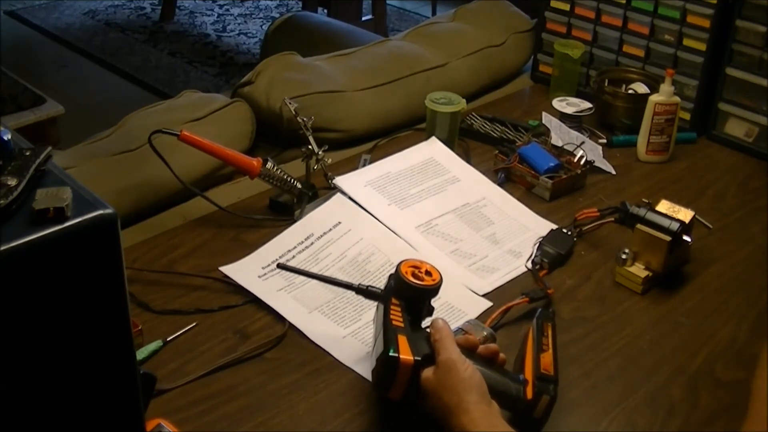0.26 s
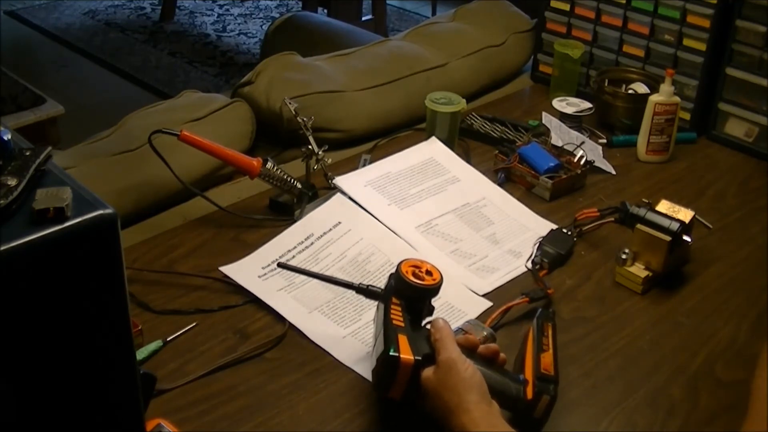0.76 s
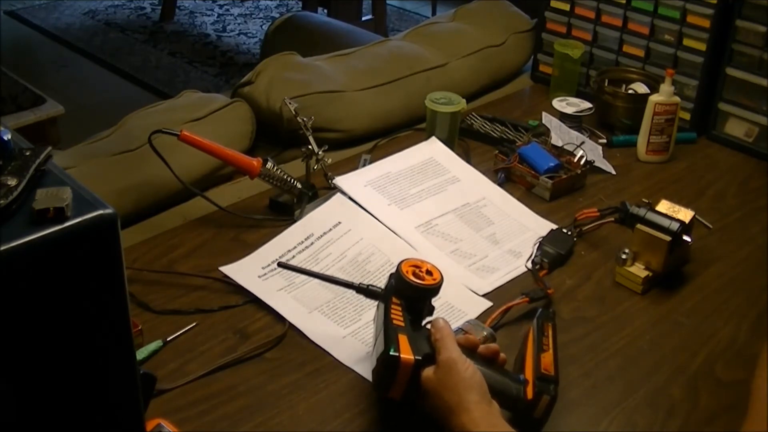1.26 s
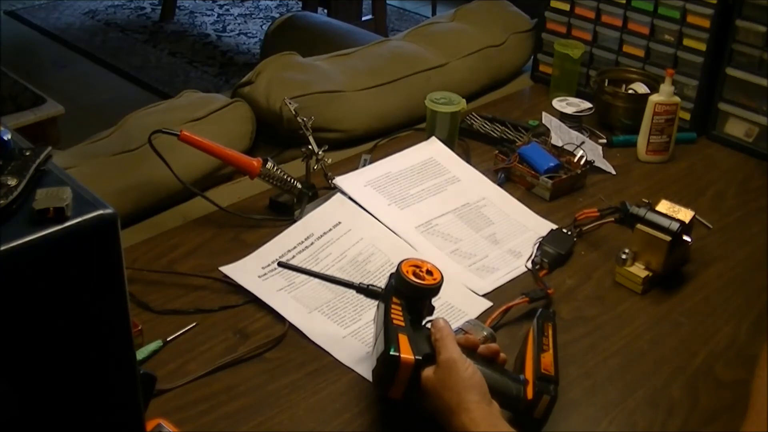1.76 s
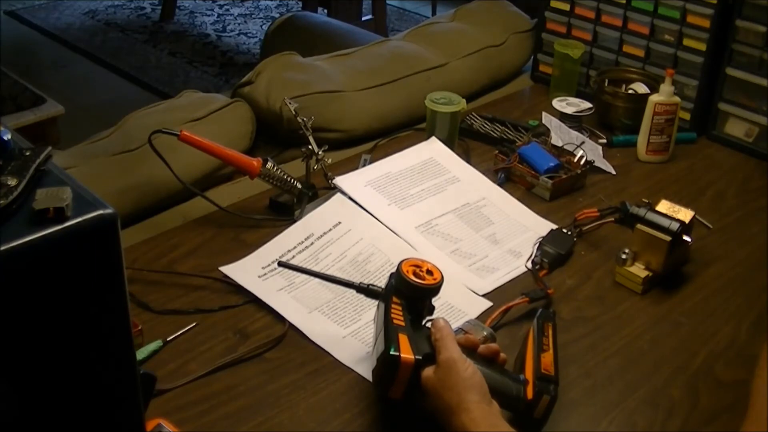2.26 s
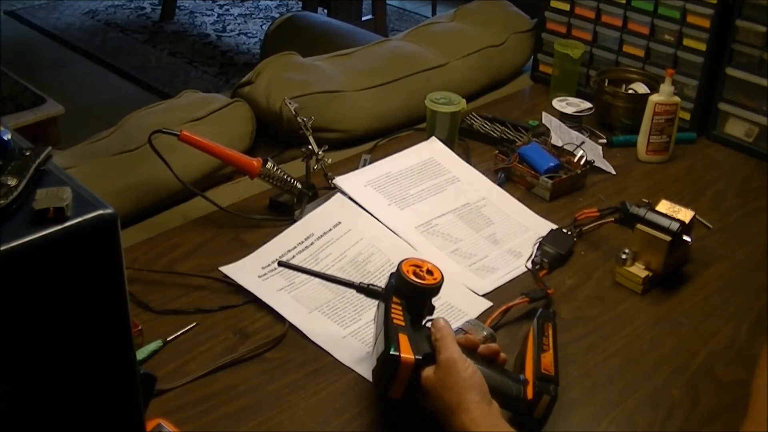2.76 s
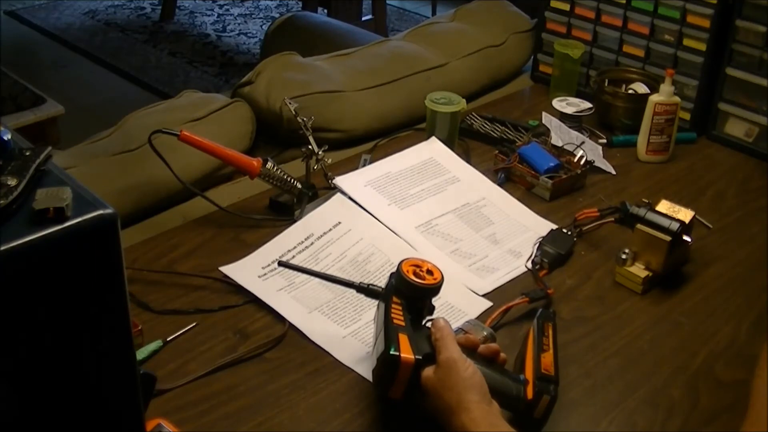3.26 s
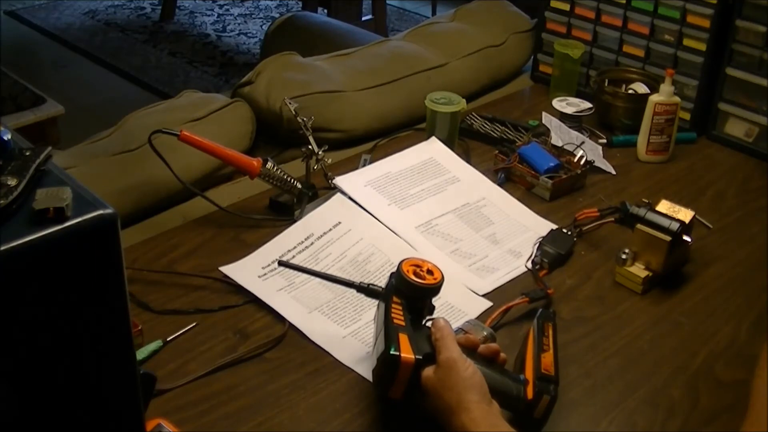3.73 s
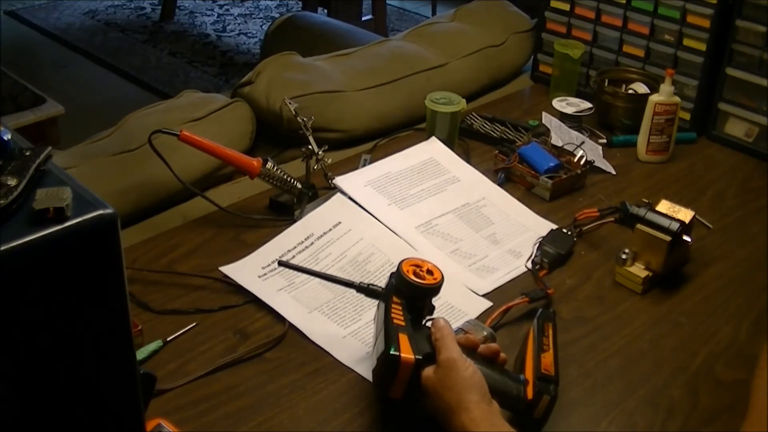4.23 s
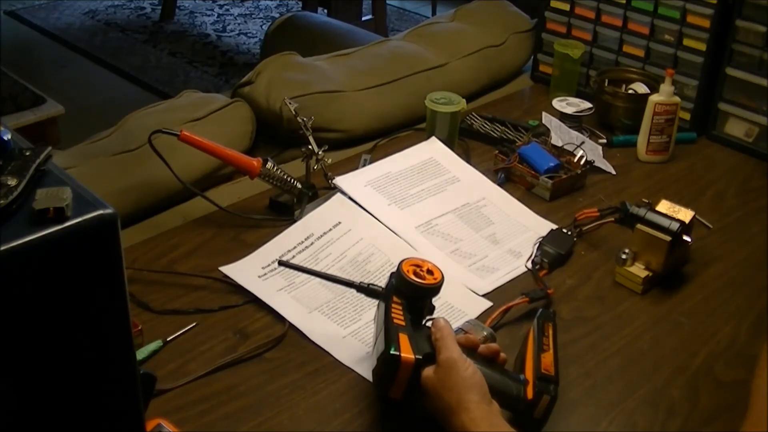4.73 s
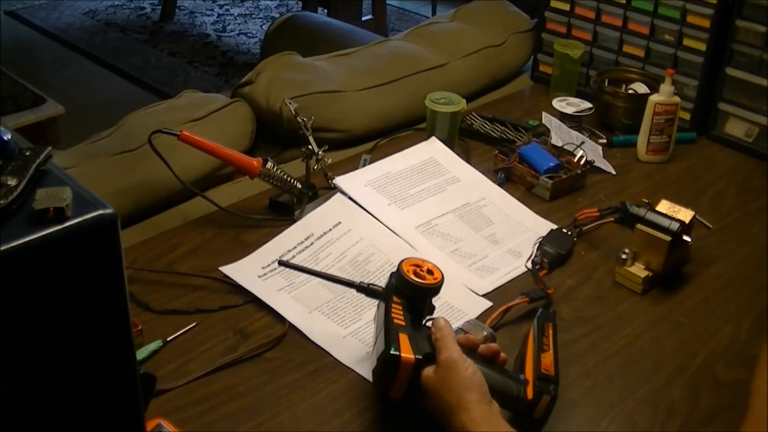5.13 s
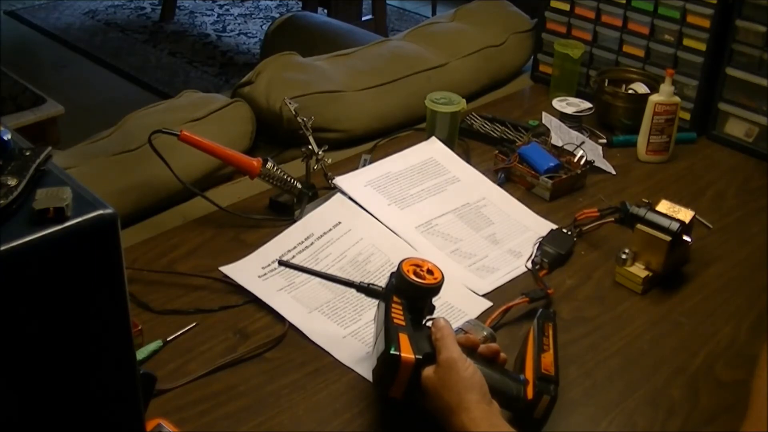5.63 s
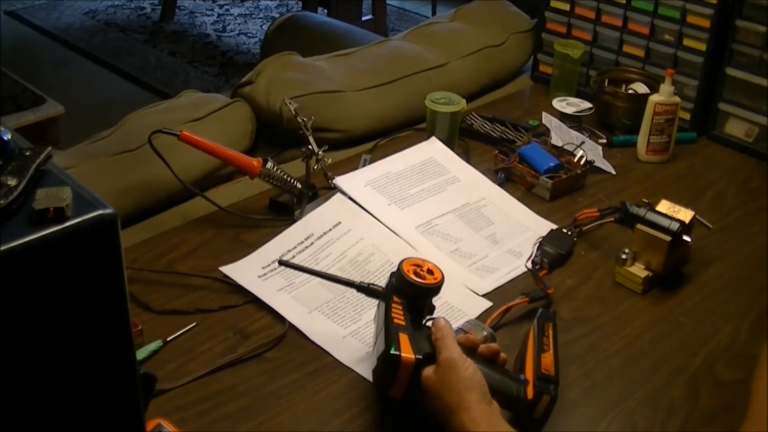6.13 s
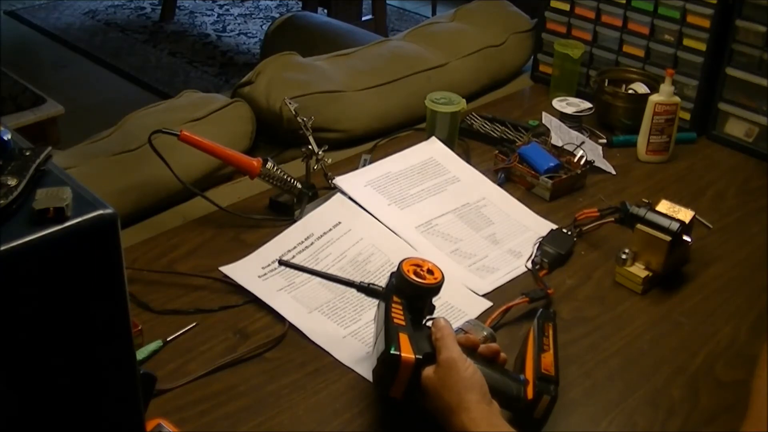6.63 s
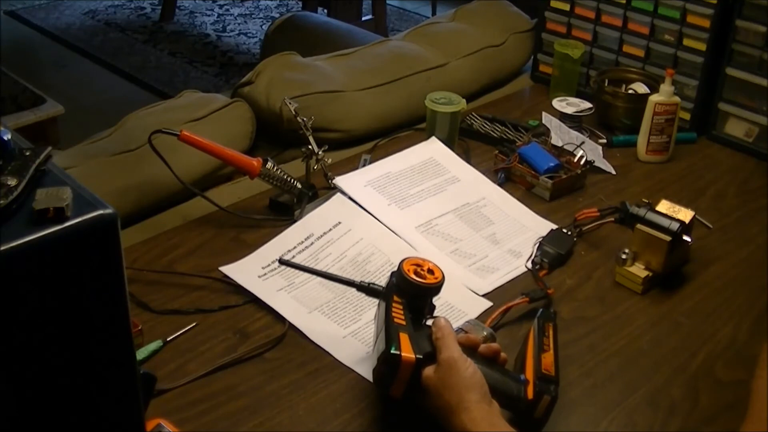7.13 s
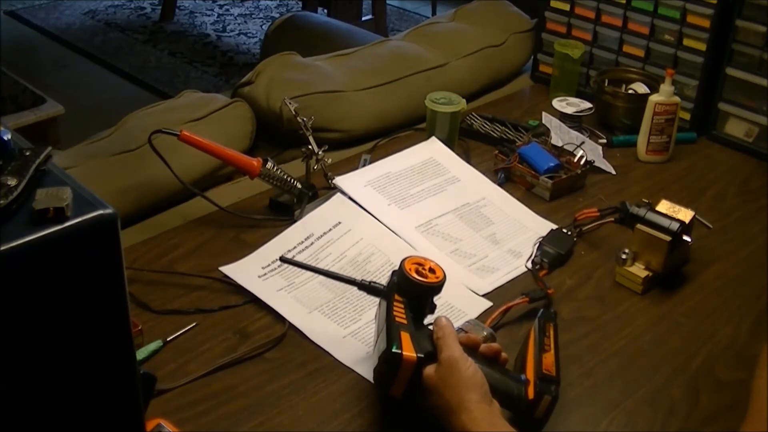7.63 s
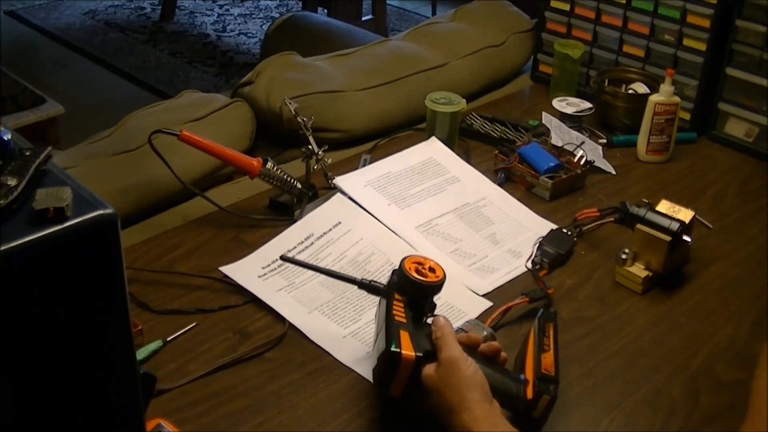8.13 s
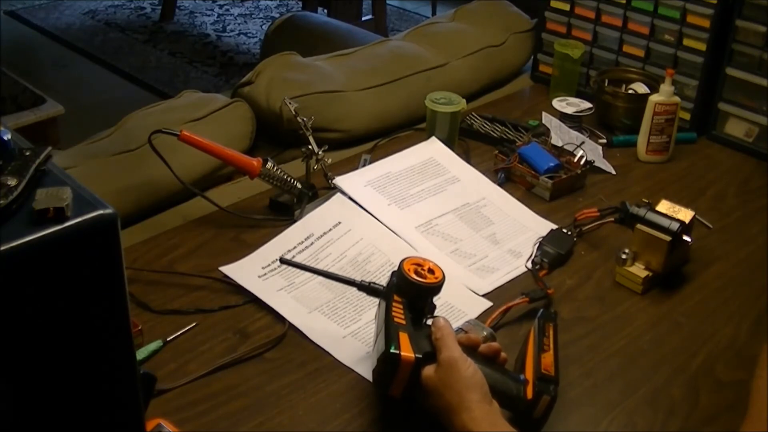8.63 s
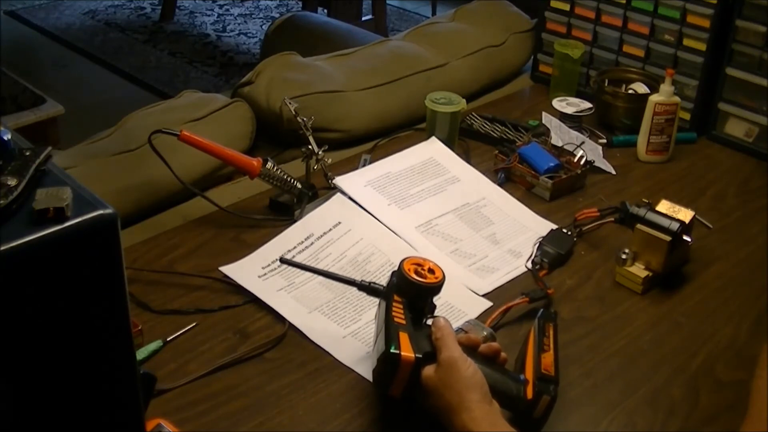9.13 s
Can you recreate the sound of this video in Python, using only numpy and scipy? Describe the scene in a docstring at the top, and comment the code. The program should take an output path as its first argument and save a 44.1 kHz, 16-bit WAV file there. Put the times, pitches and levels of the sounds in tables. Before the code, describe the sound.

A small electric motor is already running fast, close to the microphone on a wooden workbench, with a high whine and the rattle, ring and hiss of dry bearings. Its pitch eases down from about 0.5 seconds, drops further just after 2 seconds, and sinks again from 3.5 seconds. From around 4.5 to 6.8 seconds it crawls along more quietly, with a lower wavering whine, scattered light ticks and a faint high whistle. At 6.8 seconds a bright tick starts a quick rev back to full speed, where the pitch wobbles slightly. One sharp, loud knock lands at 7.8 seconds. From 8 seconds the motor coasts down, falling in pitch, and stops with a faint rub at about 9 seconds. Short echoes and the soft hush of a small room lie behind it.

```python
"""A small brushless motor on a wooden workbench, close to a stereo microphone in a quiet, cluttered room.
It runs at speed, steps down to a crawl, is revved again and coasts to a stop with a faint rub.
Magnetic pull and imbalance whine on multiples of its rotation; its dry bearings rattle, ring, hiss and
tick; at low throttle the controller's switching whistles. A bright tick starts the run-up and something
knocks sharply at its top. Short echoes and room tone lie behind."""
import sys
import numpy as np
from scipy import signal
from scipy.fft import rfft, irfft
from scipy.io import wavfile

SR = 44100
rng = np.random.default_rng(int(sys.argv[2]) if len(sys.argv) > 2 else 0)


def materialize(psi):
    """Save the field psi as 16-bit PCM at rate SR to the path in sys.argv[1].

    A 1-D psi becomes a single channel; in a 2-D psi each row is a channel.
    """
    bounded = np.clip(np.atleast_2d(psi).T, -1, 1)
    quanta = np.round(bounded * 32767).astype(np.int16)
    wavfile.write(sys.argv[1], SR, quanta)


N = 413767

FULL_SPEED, FULL_TORQUE = 320.4, 1400   # starting speed in rps (turns per s); full torque in rps per s
COAST_S, FRICTION, DRAG = 7.974, 160, 0.838   # throttle closes; steady loss in rps per s; drag per s
FIZZ_DB, FIZZ_DB_PER_DECADE = -51, 45.5   # at full speed; growth with speed
SWITCHING_HZ, CUTOFF_HZ = 7989, 15750
# the whistle: level at low throttle; loss at full speed; gain under full torque
WHISTLE_DB, WHISTLE_FADE_DB, WHISTLE_SURGE_DB = -78, 27, 22.5

# moves of the throttle: start_s, length_s, goal_rps, rotor_lag_s
THROTTLE_MOVES = [(0.45, .31, 293.3, .074), (1.347, .329, 266.5, .04), (2.144, .128, 207.6, .122),
                  (2.371, .305, 161, .118), (3.491, .445, 48.1, .334), (4.668, .017, 59.7, .3),
                  (5.78, .334, 41.9, .054), (6.171, .04, 50.7, .14), (6.8, .13, 315.3, .052),
                  (7.167, .138, 282.5, .036), (7.351, .099, 305.3, .026), (7.483, .073, 287.6, .023),
                  (7.591, .108, 316.9, .071), (7.849, .105, 300.1, .039)]
# resonances of mount and bell that the tooth whine sweeps through: centre_hz, width_hz, level_db
WHINE_RESONANCES = [(711, 130, -62), (884, 120, -43.5), (1030, 86, -41), (1330, 170, -43), (1830, 850, -54),
                    (2730, 230, -54), (3276, 143, -40.5), (3548, 200, -43.5), (3780, 110, -53.5)]
# brief dips and swells of the tooth whine: centre_s, half_length_s, gain_db
TOOTH_SWELLS = [(1.66, 0.042, 2.5), (4.44, 0.027, -17), (4.86, 0.054, -8), (5.01, 0.097, 1.5),
                (5.55, 0.21, -2), (6.0, 0.18, -3.5)]
# weaker multiples of the rotation swell on the mount's resonances; for each multiple: speed_rps, level_db
HARMONIC_LEVELS = { 1: [(125, -102), (158, -90), (180, -77), (220, -82.5), (240, -71.5), (268, -93.5),
                   (293, -66.5), (315, -67), (320, -61)], 2: [(150, -89.5), (265, -83), (293, -69.5),
                   (320, -81)], 3: [(150, -113), (198, -70), (220, -83), (267, -58.5), (280, -70),
                   (294, -58.5), (314, -64), (320, -59.5)], 11: [(60, -88), (115, -56.5), (165, -56),
                   (205, -52), (268, -58.5), (293, -47.5), (306, -59), (320, -88)], 13: [(60, -96),
                   (110, -62), (170, -62), (267, -63), (300, -81)], 14: [(80, -72), (160, -57), (230, -83),
                   (270, -109)], 22: [(170, -90), (235, -59), (267, -55), (280, -55), (294, -58),
                   (308, -54.5), (320, -52)], 23: [(48, -88), (59, -67), (68, -94)], 24: [(15, -89),
                   (37, -47), (44, -56), (50, -62), (56, -54), (60, -67), (75, -59), (110, -75)],
                   26: [(110, -76), (150, -63), (162, -62), (180, -74), (266, -73), (320, -84)],
                   60: [(45, -94), (59, -76.5), (75, -95)]}
# the dry bearings grow louder with speed, the rattle most near half speed: speed_rps, rattle_db, ring_db
BEARING_LEVELS = [(0, -97, -98), (15, -61, -83), (45, -56.5, -68), (60.2, -54, -66.5), (87.7, -52, -58.5),
                  (140, -50, -49.5), (157, -52.5, -49), (220, -53, -48), (288, -55, -48), (295, -53, -46),
                  (320, -53, -46.5)]
# the balls chatter harder: centre_s, half_length_s, rattle_gain_db, ring_gain_db, fizz_gain_db
BEARING_FLARES = [(0.1, 0.25, 1, 2.5, 1.5), (0.53, 0.074, -1, 3, 1.3), (1.25, 0.16, 0.5, 1.5, 1.5),
                  (2.164, 0.085, 3, 3, 0.5), (3.45, 0.52, 0.5, 1.5, 3), (3.98, 0.037, 1.5, 3, 3),
                  (4.31, 0.16, 1, 5.5, 3), (4.54, 0.12, 3.5, 7, 8), (6.76, 0.23, 2, 3, 2),
                  (7.45, 0.34, -0.3, 1.3, 0.2), (7.78, 0.058, 0, 3, 0.5), (7.935, .035, 2.5, 6.5, 1)]
# spectra of what the bearings shake (mount, motor bell, small parts): frequency_hz, relative_db
MOUNT_RATTLE = [(100, -58.5), (280, -28), (480, -29), (750, -11.5), (950, -5), (1130, -7.5), (1330, -0.5),
                (1600, -1.5), (1950, 3.5), (2250, -2), (2550, -14), (3100, -19.5), (6000, -42.5)]
BELL_RING = [(700, -33), (1900, -25), (2450, -8), (2850, -6.5), (3020, -14.5), (3400, -9), (4000, -10.5),
             (4600, -4.5), (4900, 0), (5120, -8), (5330, -6.5), (5550, -18.5), (7500, -22), (12000, -48.5)]
PARTS_FIZZ = [(1000, -48), (3000, -28), (5500, 9), (5850, 2), (6150, -14), (6550, 9), (6850, -8.5),
              (7700, 5), (8200, 4), (9100, 12.5), (9800, 4), (11400, -6), (13200, -17.5), (15000, -10.5),
              (16000, -39)]
# narrow modes of the motor bell: pitch_hz, t60_s, relative_db
BELL_MODES = [(2735, .06, -10), (4880, .035, -12.5), (5040, .03, -16)]
# tones of the slipping balls: rotation_multiple, loudest_rps, level_db, loss_db_per_100_rps
SKID_TONES = [(5.42, 320, -70, 34), (8.5, 320, -55.5, 51), (9.16, 287, -55.5, 35), (12.61, 320, -53, 54),
              (15.3, 320, -48.5, 29), (15.7, 320, -48.5, 38), (26, 165, -55, 45)]
# ticks of loose play in the bearings: start_s, strike_db
PLAY_TICKS = [(3.9255, -34), (4.137, -40), (4.5625, -39), (4.828, -38), (5.080, -42), (5.282, -42),
              (5.654, -41), (5.898, -42), (5.935, -40), (6.1302, -33), (6.2545, -41), (6.262, -41),
              (6.503, -43), (6.540, -41), (7.185, -35), (7.555, -33)]
# the jolt that starts the run-up: start_s, strike_db
RUN_UP_JOLT = (6.8168, -38)
# modes that the jolt rings: pitch_hz, t60_s, relative_db
RUN_UP_MODES = [(2090, 0.011, -10), (3330, 0.0088, 6), (4170, 0.0036, 5), (7140, .003, -4)]
# the knock and its chatter: start_s, strike_db
KNOCK_BLOWS = [(7.8051, -14), (7.8108, -16), (7.8158, -21.5), (7.8192, -18), (7.8254, -34)]
# modes that the knock rings: pitch_hz, t60_s, relative_db
KNOCK_RESONANCES = [(424, 0.047, -58), (690, 0.074, -43), (892, 0.066, -21), (1400, 0.02, -16.5),
                    (1975, 0.061, -22), (2345, 0.023, -7.5), (2730, 0.067, -14), (3640, 0.013, -8.5),
                    (5180, 0.0093, -8), (5720, 0.024, -13.5), (7500, 0.011, -16)]
# spectrum of the knock's wash in the bench: frequency_hz, relative_db
BENCH_WASH = [(150, -33), (350, -9.5), (800, -4), (2500, 2), (5200, -10.5), (8000, -26), (12000, -43)]
# rise and fall of the rotor's rub as it stalls: time_s, level_db
RUB_LEVELS = [(8.85, -100), (8.95, -69), (9.01, -56), (9.035, -74), (9.07, -100)]
# spectrum of that rub: frequency_hz, relative_db
RUB_SPECTRUM = [(100, -44), (190, 0), (600, 11), (2500, -4), (4260, 7.5), (5300, -3), (6400, -3),
                (7200, -7), (7850, 5), (8400, -1), (9200, -40)]
# stereo width of the echoes: frequency_hz, relative_db
ECHO_WIDTH = [(250, -1), (600, 6), (1400, -1), (2800, 7.5), (4800, -15), (7000, 4.5), (9000, 6.5),
              (13000, -9)]
# room tone at the microphone, mid and side: frequency_hz, relative_db
AIR_MID = [(25, -23), (110, -21.5), (170, -16.5), (300, -9), (500, 1), (900, 7.5), (2000, 0), (3000, -1),
           (5000, -7), (8000, -15), (12000, -23.5), (16000, -40)]
AIR_SIDE = [(25, -5), (110, -10), (300, 4), (900, 6.5), (2000, -6), (5000, -2.5), (8000, -19), (12000, -42),
            (16000, -47)]


def whine(speed, turns, teeth=12, flutter_db=1.8, shimmer_db=0.5, jitter_turns=0.0028,
          wobble=0.25, wobble_rps=105, coast_db=-12):
    """Magnetic pull and imbalance give tones on exact multiples of the rotation."""
    angle = 2 * np.pi * (turns + jitter_turns * drift(35))
    swell = from_db(swells(TOOTH_SWELLS)[0] + shimmer_db * drift(70))
    out = tooth_gain(teeth * speed) * swell * np.sin(teeth * angle)
    # around one speed the rotor wobbles in its play and the tooth whine rasps
    out *= 1 + wobble * np.exp(-((speed - wobble_rps) / 35) ** 2) * (np.sin(angle) + drift(160))
    for multiple, rows in HARMONIC_LEVELS.items():
        rps, db = np.transpose(rows)
        flutter = flutter_db * min(multiple / 10, 1) * drift(25)   # the lowest tones are steadiest
        level = np.interp(speed, rps, db) + flutter
        if multiple == 24:   # torque ripple fades without current
            level += coast_db * coasting()
        audible = (multiple * speed < CUTOFF_HZ) * np.minimum(speed / rps[0], 1) ** 5
        out += audible * from_db(level) * np.sin(multiple * angle + rng.uniform(0, 2 * np.pi))
    return np.sqrt(2) * out


def tooth_gain(hz, lowest_hz=700):
    """The whine swells on each resonance and radiates little below the lowest."""
    peaks = sum(from_db(db) / (1 + (2 * (hz - centre) / width) ** 2)
                for centre, width, db in WHINE_RESONANCES)
    return peaks * np.minimum(hz / lowest_hz, 1) ** 3


def rotor_speed():
    """The rotor lags behind each move of the throttle, then friction and drag bring it to rest."""
    t = np.arange(N) / SR
    speed, before = np.full(N, FULL_SPEED), FULL_SPEED
    for start, length, goal, lag in THROTTLE_MOVES:
        ramp = np.clip((t - start) / length, 0, 1)
        pole = np.exp(-1 / (lag * SR))
        speed += (goal - before) * signal.lfilter([1 - pole], [1, -pole], ramp)
        before = goal
    release_speed = np.interp(COAST_S, t, speed)
    free = (release_speed + FRICTION / DRAG) * np.exp(-DRAG * (t - COAST_S)) - FRICTION / DRAG
    return np.where(t < COAST_S, speed, np.maximum(free, 0))


def torque(speed):
    """Share of the full torque that goes into speeding up."""
    return np.clip(np.gradient(speed) * SR / FULL_TORQUE, 0, 1)


def coasting(fade_s=0.4):
    """0 under power, 1 once the current has died away."""
    return np.clip((np.arange(N) / SR - COAST_S) / fade_s, 0, 1)


def bearings(speed, turns, rattle_db=-1.0, ring_db=-0.5, modes_db=0.5, unsteady_db=1.15):
    """The rolling force rattles the mount, rings the bell and fizzes in the small parts."""
    rattle, bell, fizz = bearing_gains(speed)
    front, rear = rolling(speed, turns, track_db=3), rolling(speed, turns, track_db=1)
    modes = sum(from_db(db + modes_db) * rms_one(ring(front, hz, t60)) for hz, t60, db in BELL_MODES)
    out = from_db(rattle_db) * rattle * colour(front, MOUNT_RATTLE)
    out += bell * (from_db(ring_db) * colour(rear, BELL_RING) + (speed / FULL_SPEED) ** 0.3 * modes)
    out += fizz * colour(rolling(speed, turns, track_db=-0.5), PARTS_FIZZ)
    return high_pass(out * from_db(unsteady_db * drift(60)), hz=320, order=3)


def rolling(speed, turns, track_db, cage_ratio=.385, hiss_db=-4, hits_per_turn=11, spread_db=3.0,
            throb=0.15, slip_turns=0.0032):
    """Force in a bearing: random ball impacts, fine friction and a rough track repeating with the cage."""
    sizes = from_db(spread_db * np.minimum(rng.exponential(1, N), 4)) * rng.choice([-1, 1], N)
    chance = hits_per_turn * (speed + 10) / SR
    impacts = rms_one(sizes * (rng.random(N) < chance) / np.sqrt(chance))
    harmonics = from_db(rng.normal(0, 3, 140)) * np.exp(2j * np.pi * rng.random(140))
    roughness = rms_one(irfft(np.r_[0, harmonics], 4096))   # one lap of the track
    cage_position = (cage_ratio * turns + slip_turns * drift(20)) % 1
    track = np.interp(cage_position, np.linspace(0, 1, len(roughness)), roughness)
    buzz = from_db(track_db) * (speed / speed.max()) ** 1.02   # the faster, the more the track takes over
    hiss = from_db(hiss_db) * rng.standard_normal(N)
    force = (impacts + hiss + buzz * track) / np.sqrt(1 + buzz ** 2 / 2)
    return force * (1 + throb * np.sin(2 * np.pi * turns))   # the load swings once a turn


def bearing_gains(speed, rattle_load_db=1.0, fizz_load_db=0.5,
                  rattle_coast_db=-0.7, ring_coast_db=-0.4, fizz_coast_db=-3.0):
    """Rattle, ring and fizz follow speed and flare now and then; torque lifts rattle and fizz."""
    load, free = torque(speed), coasting()
    rps, rattle_db, ring_db = np.transpose(BEARING_LEVELS)
    rattle = np.interp(speed, rps, rattle_db) + rattle_load_db * load + rattle_coast_db * free
    bell = np.interp(speed, rps, ring_db) + ring_coast_db * free
    fizz = FIZZ_DB + FIZZ_DB_PER_DECADE * np.log10((speed + 1) / FULL_SPEED)
    fizz += fizz_load_db * load + fizz_coast_db * free
    return from_db(np.array([rattle, bell, fizz]) + swells(BEARING_FLARES))


def skidding_balls(speed, turns, slip_turns=0.0394, flutter_db=4.5):
    """The balls skid, so their tones waver and mostly lie between the multiples of the rotation."""
    out = np.zeros(N)
    for multiple, loudest_rps, db, loss_db in SKID_TONES:
        gain = from_db(db - loss_db * abs(speed - loudest_rps) / 100 + flutter_db * drift(60))
        out += gain * np.sin(2 * np.pi * multiple * (turns + slip_turns * drift(14)))
    return out


def controller(speed, turns, sideband_db=-12):
    """The switching whistle grows with current and fades towards full throttle."""
    phase = 2 * np.pi * SWITCHING_HZ * np.arange(N) / SR
    sideband = from_db(sideband_db) * np.sin(phase - 8 * np.pi * turns)   # four rotation rates below
    level = WHISTLE_DB - WHISTLE_FADE_DB * (speed / FULL_SPEED) ** 2 + WHISTLE_SURGE_DB * torque(speed)
    return np.sqrt(2) * from_db(level) * (1 - coasting()) * (np.sin(phase) + sideband)


def shaft_ticks(low_hz=1800, high_hz=4800, treble_db=-18, t60_s=.005):
    """Short dead ticks of the shaft in its play, and a brighter one as the torque returns."""
    taps, jolt = clicks(*np.transpose(PLAY_TICKS)), clicks(*np.array(RUN_UP_JOLT))
    out = ring(taps, low_hz, t60_s) + from_db(treble_db) * ring(taps, high_hz, t60_s)
    out += sum(ring(jolt, hz, t60) * from_db(db) for hz, t60, db in RUN_UP_MODES)
    return signal.sosfilt(signal.butter(3, [900, 9000], "band", fs=SR, output="sos"), out)


def knock(wash_db=-29, wash_t60_s=0.22, attack_s=0.00058):
    """A hard blow chatters a few times and leaves a short wash in the bench."""
    starts, strike_db = np.transpose(KNOCK_BLOWS)
    out = np.zeros(N)
    for k, (hz, t60, mode_db) in enumerate(KNOCK_RESONANCES):
        blows = clicks(starts, strike_db + mode_db + rng.normal(0, 1, len(starts)))
        out += ring(blows, hz, t60) * (-1) ** k
    age = np.maximum(np.arange(N) / SR - starts[0], 0)
    wash = from_db(wash_db - 60 * age / wash_t60_s) * (1 - np.exp(-age / attack_s))
    return high_pass(out + wash * colour(rng.standard_normal(N), BENCH_WASH), hz=380, order=4)


def stall_rub():
    """The rotor rubs faintly as it stalls."""
    level = np.interp(np.arange(N) / SR, *np.transpose(RUB_LEVELS))
    return from_db(level) * colour(rng.standard_normal(N), RUB_SPECTRUM)


def reflections(x, t60_s=0.45, delay_s=.003):
    """Diffuse echoes of the small room reach the microphone after the direct sound; unit power gain."""
    age = np.arange(SR // 3) / SR
    echo = rng.standard_normal(len(age)) * from_db(-60 * age / t60_s) * (age > delay_s)
    return signal.fftconvolve(x, echo / np.linalg.norm(echo))[:N]


def room_tone(spectrum, level_db=-67):
    """The steady hush of the room around the microphone."""
    return from_db(level_db) * colour(rng.standard_normal(N), spectrum)


def from_db(db):
    """Decibels to gain."""
    return np.exp(np.asarray(db) * (np.log(10) / 20))


def rms_one(x):
    """Scale to unit rms."""
    return x / np.sqrt(np.mean(x ** 2) + 1e-20)


def drift(rate_hz):
    """A random wander of unit rms that turns about rate_hz times a second."""
    knots = rng.standard_normal(N // 10)
    return rms_one(np.interp(np.arange(N) / SR * rate_hz, np.arange(len(knots)), knots))


def swells(rows):
    """Bell-shaped rises and falls in dB, one track for each level column."""
    t = np.arange(N) / SR
    return sum(np.outer(db, np.exp(-np.minimum(((t - centre) / half_length) ** 2, 20)))
               for centre, half_length, *db in rows)


def colour(x, spectrum, size=16384):
    """Causal filter with the given spectrum; the result has unit rms."""
    hz, db = np.transpose(spectrum)
    bins_hz = np.fft.rfftfreq(size, 1 / SR)
    log_gain = np.log(from_db(np.interp(np.log1p(bins_hz), np.log(hz), db)))
    cepstrum = irfft(log_gain)[:size // 2]
    response = irfft(np.exp(2 * rfft(cepstrum, size) - cepstrum[0]))   # minimum phase
    return rms_one(signal.oaconvolve(x, response)[:N])


def ring(x, hz, t60):
    """One mode: a unit click sets a sine of height 1 ringing."""
    r, w = from_db(-60 / (t60 * SR)), 2 * np.pi * hz / SR
    return signal.lfilter([0, np.sin(w)], [1, -2 * r * np.cos(w), r * r], x + 1e-18)


def clicks(times, db):
    """Single-sample blows."""
    out = np.zeros(N)
    out[np.round(times * SR).astype(int)] = from_db(db)
    return out


def high_pass(x, hz, order):
    """Small things radiate little bass."""
    return signal.sosfilt(signal.butter(order, hz, "high", fs=SR, output="sos"), x)


def scene(wet_db=-7.0, side_db=-23, pan_db=0.24, air_side_db=-15):
    """Motor and knock close in front of the microphone, nearly centred, with the quiet room behind."""
    speed = rotor_speed()
    turns = np.cumsum(speed) / SR
    rub = stall_rub()
    motor = whine(speed, turns) + bearings(speed, turns) + skidding_balls(speed, turns)
    direct = motor + controller(speed, turns) + shaft_ticks() + knock() + rub
    air_mid, air_side = room_tone(AIR_MID), room_tone(AIR_SIDE)
    mid = direct + from_db(wet_db) * reflections(direct) + air_mid
    side = from_db(side_db) * direct.std() * colour(reflections(direct), ECHO_WIDTH)
    side += from_db(air_side_db) * air_side
    return np.array([(mid + side) * from_db(-pan_db), (mid - side) * from_db(pan_db)])


def record(dry):
    """The microphone signal is cut steeply at the top of the treble."""
    return signal.sosfilt(signal.ellip(12, .1, 80, CUTOFF_HZ, fs=SR, output="sos"), dry)


dry = scene()
out = record(dry)
materialize(out)
```